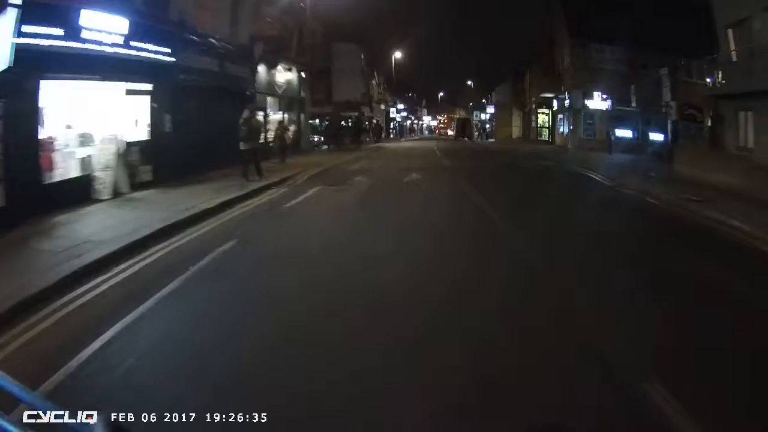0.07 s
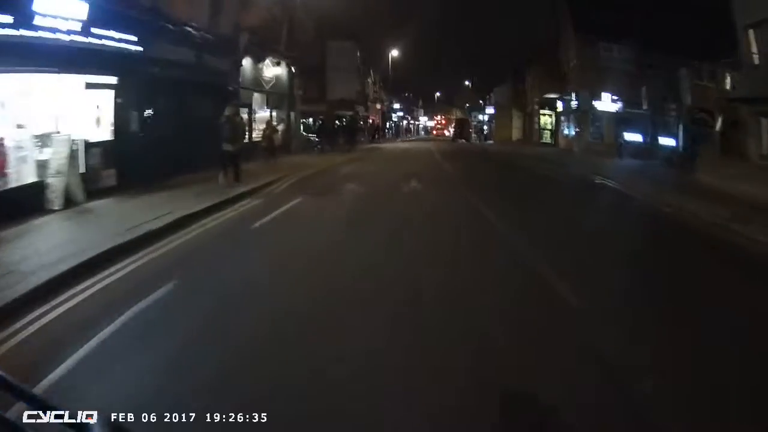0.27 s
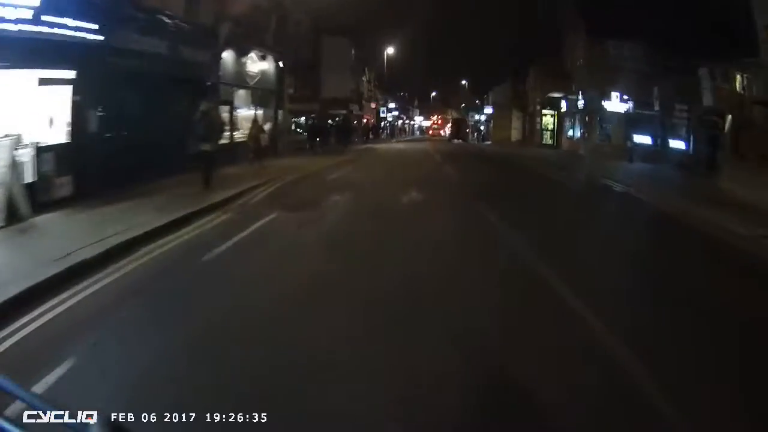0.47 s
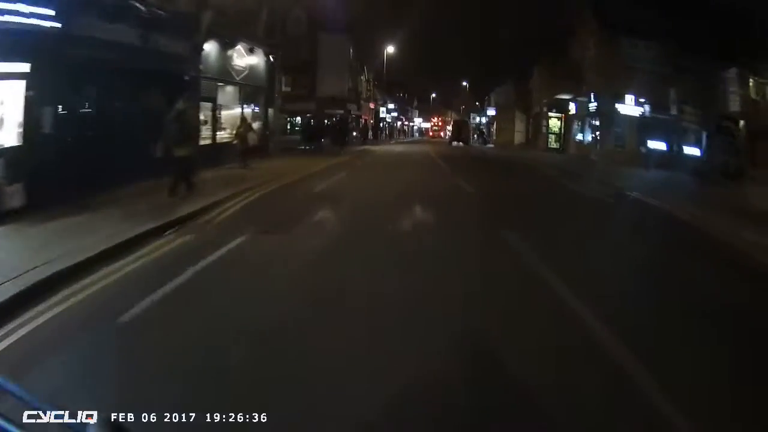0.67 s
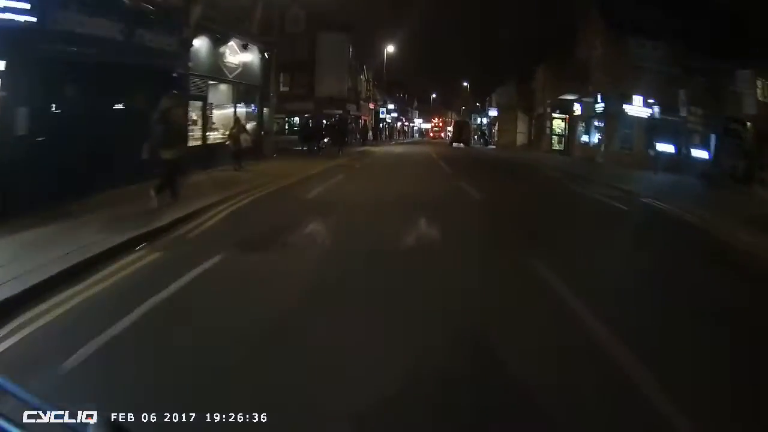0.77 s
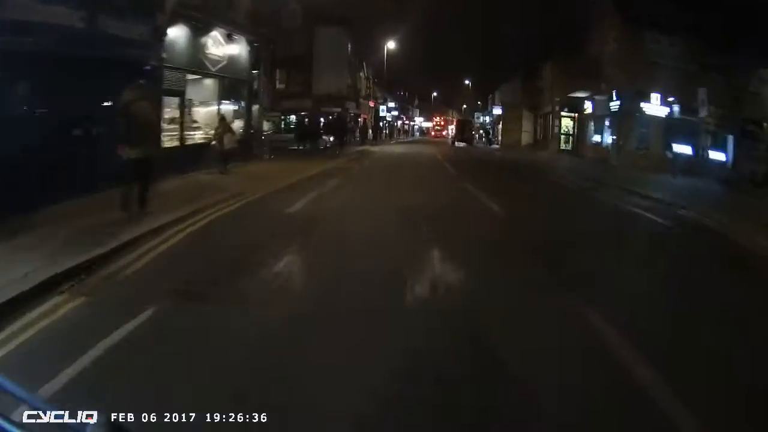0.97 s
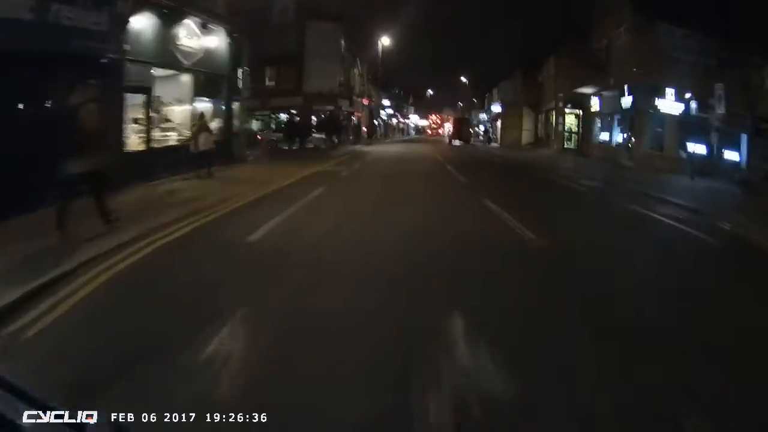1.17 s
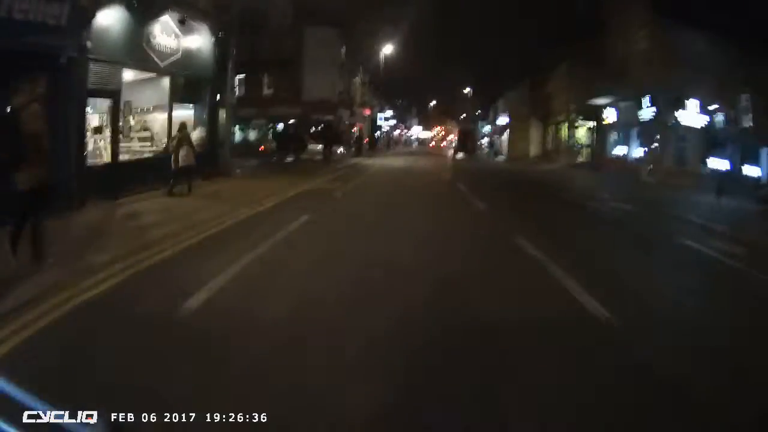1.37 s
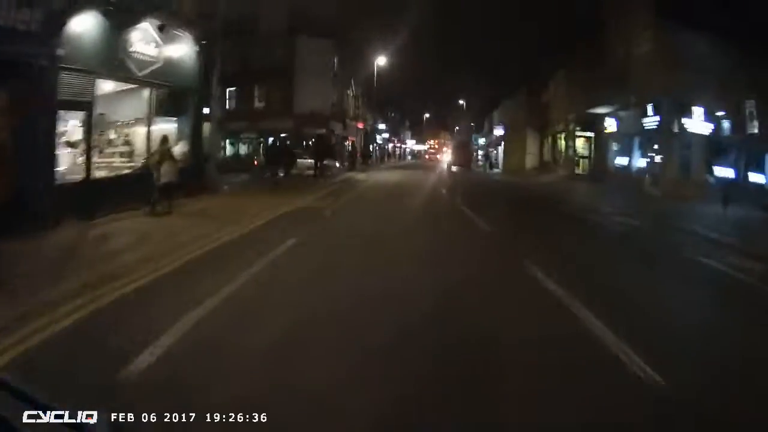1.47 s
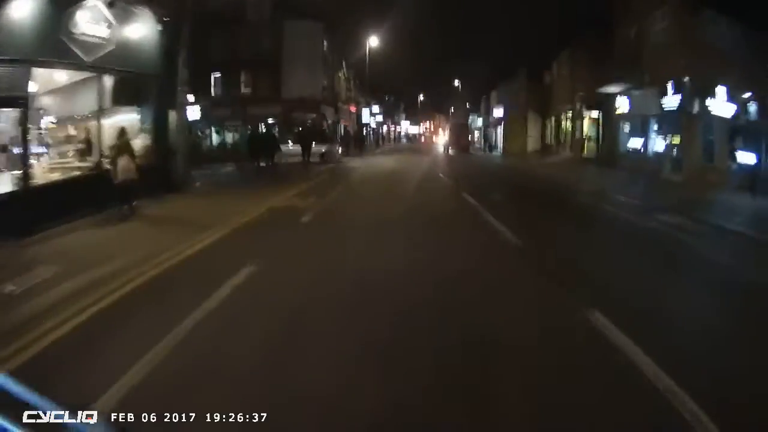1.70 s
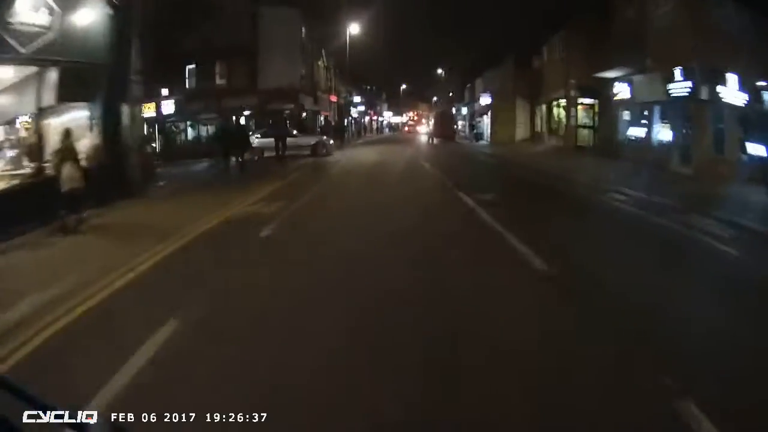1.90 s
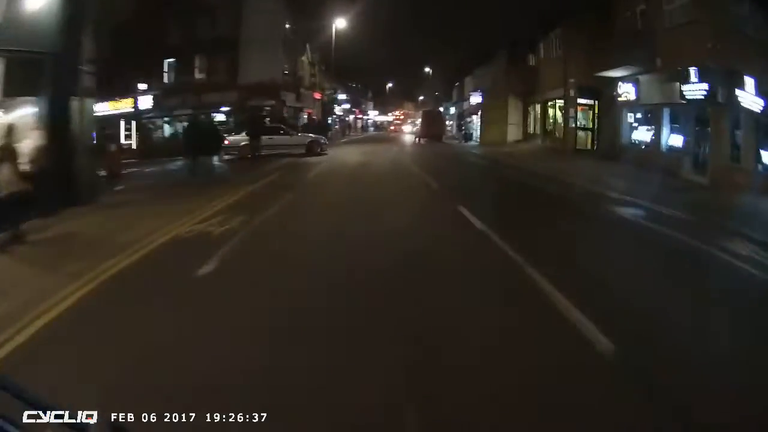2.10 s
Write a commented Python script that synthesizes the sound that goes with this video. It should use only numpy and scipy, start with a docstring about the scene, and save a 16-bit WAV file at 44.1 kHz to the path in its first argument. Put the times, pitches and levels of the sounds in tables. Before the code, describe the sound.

On a handlebar microphone outdoors, tyres rumble and wind buffets softly while the chain ticks; a jolt clatters loose fittings, coasting follows, then a two-dome metal bell strikes high and low, close and clear.

```python
"""A bicycle ride fades in: tyre rumble, a quick scrape, chain ticks and low wind on the handlebar microphone.
A bump sways the bar and rattles its fittings; then a two-tone bell rings, high dome first, low dome second.
Shaped noise makes the rumble, wind, chain and grit; each bell dome is a set of fading pairs of sine waves.
Taps and short noise bursts, passed through filters that act as the parts' bodies, make the rattles and lever."""
import sys
import numpy as np
from scipy import signal
from scipy.fft import rfft, irfft
from scipy.io import wavfile
from scipy.ndimage import uniform_filter1d

SR = 44100
rng = np.random.default_rng(int(sys.argv[2]) if len(sys.argv) > 2 else 0)


def file_out(sig):
    """Save sig as 16-bit WAV at sys.argv[1]."""
    # one column per channel
    cols = np.atleast_2d(sig).T
    # limit, then scale
    lim = np.clip(cols, -1, 1)
    pcm = np.round(lim * 32767).astype(np.int16)
    wavfile.write(sys.argv[1], SR, pcm)


N = 94594  # length of the sound in samples

# Ringing tones of the bell's two domes, each with a close twin that beats against it:
# pitch_hz, level_db, time to fade by 60 dB (t60_s), twin_offset_hz, twin_level_db (against its partner)
HIGH_DOME_MODES = [(1302.5, -42, 6.9, -39, -13), (3294, -38.9, 8, 1.16, -4.1), (5837, -36, 1.26, 3.3, -13),
                   (8792, -38.4, .61, 2.5, -17), (12098, -33, .18, 14, -21), (15100, -64, .09, 50, -8)]
LOW_DOME_MODES = [(1044, -35.4, 2.1, -26.5, -14), (2171, -48, .2, 7, -8), (2565, -34.8, 1.1, 6.4, -15),
                  (2681, -46, .3, 22, -8), (4567, -38, .93, 26, -18), (4715, -34, .125, 6, -9),
                  (6956, -46, .36, 9.9, -7), (9350, -54, .38, 24, -10), (9711, -70, .4, 12, -10),
                  (12025, -47.7, .18, 9, -12), (12800, -46, .04, 60, -10)]
# One strike on each dome: start_s, level_db, click_level_db
HIGH_STRIKE = (1.679, 0, -18)
LOW_STRIKE = (2.0025, 0, -24.5)
STRIKE_RISE_S, CLICK_RISE_S, CLICK_LEAD_S, CLICK_T60_S = 0.001, 0.0016, 0.0023, 0.017
# Tone of the striker's click: pitch_hz, level_db
CLICK_BODY = [(300, 12), (600, 6), (950, 8.5), (1200, -6), (1800, -3.5), (2400, 2.5), (4500, -11.5),
              (6300, -2.5), (8000, -15.5), (10500, -9), (13000, -16), (15000, -22), (17000, -34)]
# The lever knocks on the press, slides back, slams on its stop and bounces: start_s, level_db
LEVER_KNOCKS = [(1.679, -30), (1.682, -32.5), (1.9875, -26), (1.992, -37), (1.998, -34), (2.001, -15),
                (2.005, -15.5), (2.01, -38)]
# Tone of the lever's body: pitch_hz, level_db
LEVER_BODY = [(150, -26), (420, -8), (520, 2.5), (700, -15), (900, -5.5), (1130, -1), (1400, 3.5),
              (1720, -8.5), (2020, 7.5), (2400, -10), (2900, -3.5), (3800, -29.5), (5800, -24), (8000, -36),
              (16000, -39)]
# The return spring buzzes after the lever lands: start_s, level_db, t60_s
SPRING_BUZZ = (2.003, -39, 0.13)
# Tone of the return spring: pitch_hz, level_db
SPRING_BODY = [(1500, -18), (2100, -2), (2350, -12), (2700, 0), (3100, 3), (3900, -26), (4300, -1),
               (4900, -3), (5400, -25), (6200, -38), (6800, -26), (7600, -46), (16000, -54)]

# Jolts that set the handlebar swaying: start_s, level_db
JOLTS = [(0.973, -16), (1.273, -13), (1.384, -5), (1.726, -12.5), (1.886, -15)]
SWAY_HZ, SWAY_RISE_S, SWAY_T60_S = 20.9, 0.013, 0.69
# Rough spots in the road thud through the frame: start_s, level_db
THUDS = [(.286, -21), (.527, -25), (.619, -15), (.706, -22), (1.390, -18)]
# Tone of the thuds: pitch_hz, level_db
THUD_BODY = [(50, 2.5), (88, -1.5), (150, -10.5), (300, -7), (480, -26.5), (680, -21), (1500, -55.5),
             (6000, -80)]
THUD_RISE_S, THUD_T60_S = 0.0009, 0.025
# Brief scrape as the ride fades in: start_s, level_db
SCRAPES = [(.132, -44), (.1415, -35), (.157, -41.5), (.168, -47)]
# Tone of the scrape: pitch_hz, level_db
SCRAPE_BODY = [(900, 3), (1500, 4), (1900, 5), (2500, -1), (3200, -11.5), (3900, -10.5), (4400, -19),
               (5000, -13), (6000, -28.5), (12000, -39.5)]
SCRAPE_RISE_S, SCRAPE_T60_S = 0.0011, 0.025
# Sharp ticks of grit: start_s, level_db
GRIT_TICKS = [(.293, -53), (.531, -48.5), (.711, -50), (1.259, -60), (1.3952, -41), (1.4075, -40),
              (1.4175, -33), (1.421, -35)]
# Tone of a grit tick: pitch_hz, level_db
TICK_BODY = [(1000, 6), (4500, -0.5), (7000, -7.5), (10000, -4.5), (12000, -12.5), (16000, -23)]
TICK_RISE_S, TICK_T60_S = 0.00018, 0.005

# Loose fittings rattle: start_s, level_db, added_brightness_db
RATTLES = [(1.3918, -44.5, 12), (1.4027, -30.5, -4), (1.4169, -18, 0), (1.4218, -27.5, 2.5),
           (1.430, -32, -3), (1.434, -27.5, -4), (1.4374, -22.5, -7), (1.4419, -34, -7), (1.450, -47, 6),
           (1.452, -40, -8), (1.4575, -24.5, -1), (1.4688, -27.5, -12), (1.475, -57, -4)]
# Tone of the fittings: pitch_hz, level_db
RATTLE_BODY = [(300, -9), (560, 3.5), (740, 5), (890, -1), (1020, 6), (1130, -7), (1300, 2), (1650, -8),
               (2060, 6.5), (2300, -0.5), (2600, -20), (3200, -11), (3700, -25.5), (4200, -16.5),
               (5000, -20.5), (5600, -30), (8000, -39), (11000, -45), (16000, -66)]
# A light loose part taps on the bar: start_s, level_db, added_brightness_db
LIGHT_TAPS = [(1.2835, -38, -13), (1.2904, -30.5, -13), (1.2945, -37, -10), (1.4935, -47, -4),
              (1.4965, -35, -6), (1.5118, -29, -25), (1.515, -33, -13), (1.5255, -56, -3),
              (1.5465, -33, -14), (1.568, -51, -7), (1.5902, -47, 2), (1.597, -41.5, -1), (1.609, -38, -10),
              (1.6135, -36, -14), (1.631, -44, 0), (1.6509, -34, -14), (1.664, -63, -8), (1.722, -48, -6),
              (1.738, -49, 1), (1.7516, -44, 12), (1.7635, -42, 11), (1.768, -55, 9), (1.788, -41.5, 1),
              (1.799, -44, -3), (1.83, -47, -5), (1.875, -49, -5), (1.9225, -45, 9), (1.964, -44, -6)]
# Tone of the light part: pitch_hz, level_db
TAP_BODY = [(500, -20.5), (1000, -6.5), (1300, -3.5), (1650, -10), (1900, -2.5), (2060, 4), (2300, -1.5),
            (2620, -16.5), (3230, -11.5), (3600, -21.5), (4200, -21), (5000, -21), (5700, -29),
            (7000, -40.5), (16000, -62.5)]
# Faint chatter between the louder rattles: time_s, level_db
CHATTER_LEVEL = [(1.2, -72), (1.39, -62), (1.44, -50), (1.48, -59), (1.53, -62), (1.66, -63), (1.77, -58),
                 (1.86, -68), (2.14, -68)]
CHATTER_GRAIN_DB, CHATTER_RATE_HZ, CHATTER_BRIGHT_DB = -2.5, 250, -1.5
# Every contact of lever, fittings or light part: a first tap, then rough settling
CONTACT_RISE_S, CONTACT_T60_S, BRIGHT_HZ = 0.0009, 0.019, 3200
TAP_DB, SETTLE_DB = 12, -2

# Tone of the tyre rumble through the frame: pitch_hz, level_db
ROAD_TONE = [(60, -3.5), (87, -3.5), (156, -12.5), (217, -7.5), (260, -8.5), (305, -6.5), (380, -7.5),
             (470, -24), (540, -25.5), (593, -16.5), (682, -16.5), (822, -20.5), (924, -31.5),
             (1015, -23.5), (1130, -36.5), (1300, -28.5), (1500, -38.5), (1750, -42), (1970, -33.5),
             (2200, -48.5), (2700, -49), (3050, -52.5), (3800, -65.5), (6000, -71), (11200, -75),
             (13000, -90), (16000, -105)]
# Rumble over time, before the trims below: time_s, low_level_db, upper_level_db
ROAD_LEVEL = [(0.11, -28, -41.5), (0.17, -24.5, -36.5), (1.1, -27.5, -38.5), (1.22, -24.5, -37.5),
              (1.3, -31, -40.5), (1.39, -30.5, -38.5), (1.47, -33.5, -44), (1.77, -34, -44),
              (1.96, -44, -51.5), (2.0, -35, -39.5), (2.04, -42, -53), (2.14, -42.5, -47)]
LOW_TRIM_DB, UPPER_TRIM_DB, SPLIT_HZ, GRAIN_DB, GRAIN_RATE_HZ = 0.5, 1, 377, 1.5, 90
# The tread hums where the frame resonates: pitch_hz, width_hz, level_db (against the low rumble)
FRAME_HUM = (298, 16, -7.5)

# Tone of the chain meeting the sprocket: pitch_hz, level_db
CHAIN_BODY = [(1500, -10), (1830, -2.5), (1980, 6.5), (2200, 0), (2750, -11), (2980, 4.5), (3300, -14.5),
              (4100, -17.5), (4500, -16.5), (5300, -30), (9000, -32.5), (16000, -58.5)]
# Strength of the chain ticks: time_s, level_db
CHAIN_LEVEL = [(.1, -54), (.65, -53), (1.2, -53.5), (1.32, -51.5), (1.42, -94)]
LINKS_PER_S, LINK_DECAY_S, LINK_SCATTER_DB = 50.3, 0.004, 1
SURGE_HZ, SURGE_DB = 6.4, 2
SURGE_AT_S = 0.15  # one of the hardest moments of the pedal stroke

# Tone of grit sprayed from the tyre: pitch_hz, level_db
SPRAY_TONE = [(3000, 6.5), (5000, 0), (8000, -3.5), (11000, -5.5), (14000, -33), (16000, -35.5)]
# Bursts of grit: middle_s, length_s, level_db
SPRAY_BURSTS = [(.52, 0.035, -77.5), (1.262, 0.017, -62.5), (1.445, 0.027, -60)]
SPRAY_GRAIN_DB = 2.5

# Tone of the wind on the microphone: pitch_hz, level_db
WIND_TONE = [(8, 17.5), (18, 18), (35, 13.5), (58, -0.5), (84, 14), (115, -1.5), (200, -64.5), (11500, -60),
             (14000, -72.5), (16000, -81.5)]
# Strength of the wind: time_s, level_db
WIND_LEVEL = [(.1, -28), (.45, -25), (.7, -24), (.85, -25.5), (1.02, -27.5), (1.18, -23), (1.45, -28.5),
              (1.8, -29), (2.05, -43), (2.14, -31.5)]

OPEN_S, OPEN_RISE_S, CLOSED_DB = 0.09, 0.022, -75  # the opening fade
TOP_HZ = 15600  # highest pitch that passes


def bell():
    """The high dome rings on the press; the lever's clack, the low dome and the spring's buzz follow."""
    rough = rng.standard_normal(N)
    hits = sum(undb(db) * contact(start, rough) for start, db in LEVER_KNOCKS)
    lever = colour(hits, LEVER_BODY)
    start, db, t60 = SPRING_BUZZ
    spring = knocks([(start, db)], SPRING_BODY, STRIKE_RISE_S, t60)
    return dome(HIGH_DOME_MODES, HIGH_STRIKE) + dome(LOW_DOME_MODES, LOW_STRIKE) + lever + spring


def dome(modes, strike):
    """A striker clicks on a steel dome, whose paired tones ring, beat and die away."""
    start, db, click_db = strike
    age = clock() - start
    out = knocks([(start - CLICK_LEAD_S, click_db)], CLICK_BODY, CLICK_RISE_S, CLICK_T60_S)
    for hz, mode_db, t60, offset, twin_db in modes:
        phase = 2 * np.pi * (hz * age + rng.random())
        twin = undb(twin_db) * np.sin(phase + 2 * np.pi * offset * age)
        pair = np.sin(phase) + twin
        out = out + undb(db + mode_db) * ring(start, STRIKE_RISE_S, t60) * pair
    return out


def handlebar():
    """Jolts sway the bar and thud through it; its fittings rattle and scrape, and grit ticks."""
    sway = 0
    for start, db in JOLTS:
        swing = np.sin(2 * np.pi * SWAY_HZ * (clock() - start))
        sway = sway - undb(db) * ring(start, SWAY_RISE_S, SWAY_T60_S) * swing
    thuds = knocks(THUDS, THUD_BODY, THUD_RISE_S, THUD_T60_S)
    scrape = knocks(SCRAPES, SCRAPE_BODY, SCRAPE_RISE_S, SCRAPE_T60_S)
    ticks = knocks(GRIT_TICKS, TICK_BODY, TICK_RISE_S, TICK_T60_S)
    return sway + thuds + rattles() + scrape + ticks


def rattles():
    """The fittings clatter at the bump; one light loose part keeps tapping and chattering."""
    grain = undb(CHATTER_GRAIN_DB * walk(CHATTER_RATE_HZ))
    rubbing = rng.standard_normal(N) * curve(CHATTER_LEVEL) * grain
    chatter = brighten(rubbing, CHATTER_BRIGHT_DB)
    fittings = colour(blows(RATTLES), RATTLE_BODY)
    light_part = colour(blows(LIGHT_TAPS) + chatter, TAP_BODY)
    return fittings + light_part


def road():
    """Tyre rumble with a grainy upper range, and a hum where the frame resonates."""
    f = np.fft.rfftfreq(N, 1 / SR)
    low = 1 / (1 + (f / SPLIT_HZ) ** 12)  # keeps what lies below the split
    thin = f / np.hypot(f, 120)  # softens the deepest part, below about 120 Hz
    hz, width, hum_db = FRAME_HUM
    hum = undb(hum_db) * noise(ROAD_TONE, 1 / (1 + ((f - hz) / width) ** 2))
    rumble = noise(ROAD_TONE, low * thin) + hum
    rumble = rumble * curve(ROAD_LEVEL, axis=1) * undb(LOW_TRIM_DB)
    grain = undb(UPPER_TRIM_DB + GRAIN_DB * walk(GRAIN_RATE_HZ))
    upper = noise(ROAD_TONE, 1 - low) * curve(ROAD_LEVEL, axis=2) * grain
    return rumble + upper


def chain():
    """Each link meets the sprocket with a small tick, swelling with the pedals, until the rider coasts."""
    t = clock()
    links = LINKS_PER_S * t + 0.073 * walk(6.4)  # links passed, slightly uneven
    age = links % 1 / LINKS_PER_S  # seconds since the latest link
    surge_db = SURGE_DB * np.cos(2 * np.pi * SURGE_HZ * (t - SURGE_AT_S))
    force = undb(surge_db + LINK_SCATTER_DB * walk(50.6))
    ticks = rng.standard_normal(N) * np.exp(-age / LINK_DECAY_S) * force
    return colour(ticks * curve(CHAIN_LEVEL), CHAIN_BODY)


def spray():
    """Grit sprays from the tyre in short, grainy bursts of noise."""
    bursts = sum(undb(db) * np.exp(-((clock() - middle) / length) ** 2)
                 for middle, length, db in SPRAY_BURSTS)
    return noise(SPRAY_TONE) * bursts * undb(SPRAY_GRAIN_DB * walk(600))


def wind():
    """Wind buffets the microphone: mostly very low noise that swells and eases."""
    return noise(WIND_TONE) * curve(WIND_LEVEL)


def blows(rows):
    """Contacts between hard parts, each with its own level and brightness."""
    rough = rng.standard_normal(N)
    return sum(brighten(undb(db) * contact(start, rough), bright_db) for start, db, bright_db in rows)


def contact(start, rough):
    """One hard tap, with a short rough chatter as the parts settle."""
    tap = signal.unit_impulse(N, int((start + CONTACT_RISE_S) * SR))
    settling = rough * ring(start, CONTACT_RISE_S, CONTACT_T60_S)
    return undb(TAP_DB) * tap + undb(SETTLE_DB) * settling


def knocks(rows, body, rise, t60):
    """Short rough contacts: fading bursts of noise that excite a heavily damped body."""
    strength = sum(undb(db) * ring(start, rise, t60) for start, db in rows)
    return colour(rng.standard_normal(N) * strength, body)


def ring(start, rise, t60):
    """Loudness shape of a blow: short rise, then a fade of 60 dB every t60 seconds."""
    age = np.maximum(clock() - start, 0)
    return np.minimum(age / rise, 1) * np.exp(-np.log(1000) * age / t60)


def brighten(x, db):
    """Raises, or with negative dB lowers, the part of x above BRIGHT_HZ."""
    x = x + 1e-18  # a tiny offset, far too small to hear
    low = signal.sosfilt(signal.butter(2, BRIGHT_HZ, "low", fs=SR, output="sos"), x)
    high = signal.sosfilt(signal.butter(2, BRIGHT_HZ, "high", fs=SR, output="sos"), x)
    return low - undb(db) * high  # the minus avoids a hole where the two parts meet


def colour(x, points):
    """Passes x through a body with the given tone, which answers only after it is hit."""
    hz, db = np.array(points).T
    size = 4096
    f = np.maximum(np.fft.rfftfreq(size, 1 / SR), 1)
    gain = undb(np.interp(np.log(f), np.log(hz), db)) * f / np.hypot(f, hz[0])
    # minimum phase: the response starts as early as it can
    cepstrum = irfft(np.log(gain))
    cepstrum[size // 2:] = 0
    response = irfft(np.exp(rfft(2 * cepstrum)))
    return signal.fftconvolve(x, response / np.linalg.norm(response))[:N]  # unit power gain


def noise(points, weight=1):
    """Steady noise with the given tone and an average (rms) level of 1."""
    hz, db = np.array(points).T
    f = np.maximum(np.fft.rfftfreq(N, 1 / SR), 1)
    gain = undb(np.interp(np.log(f), np.log(hz), db))
    gain = gain * np.minimum(f / hz[0], 1) ** 2  # falls away below the first point
    x = irfft(rfft(rng.standard_normal(N)) * gain * weight, N)
    return x / x.std()


def walk(rate):
    """Smooth random wandering with a spread of 1; a higher rate wanders faster."""
    k = max(int(SR / rate), 1)
    x = uniform_filter1d(uniform_filter1d(rng.standard_normal(N), k), k)
    return x / x.std()


def curve(rows, axis=1):
    """Gain over time that follows one dB column of a table."""
    rows = np.array(rows)
    return undb(np.interp(clock(), rows[:, 0], rows[:, axis]))


def clock():
    """Time of every sample in seconds."""
    return np.arange(N) / SR


def undb(db):
    """Turns decibels into gain."""
    return 10 ** (np.asarray(db) / 20)


def scene():
    """All sources added together at one microphone."""
    return (bell() + handlebar() + road() + chain() + spray() + wind())[None, :]


def record(dry):
    """The sound fades in quickly and loses everything above its top pitch."""
    fade = np.clip((clock() - OPEN_S) / OPEN_RISE_S, undb(CLOSED_DB), 1)
    top_filter = signal.ellip(8, .2, 80, TOP_HZ, fs=SR, output="sos")
    return signal.sosfilt(top_filter, dry * fade)


dry = scene()
out = record(dry)
file_out(out)
```